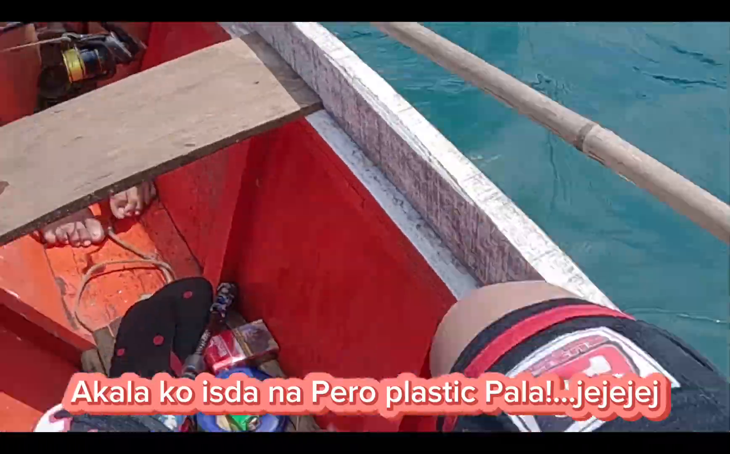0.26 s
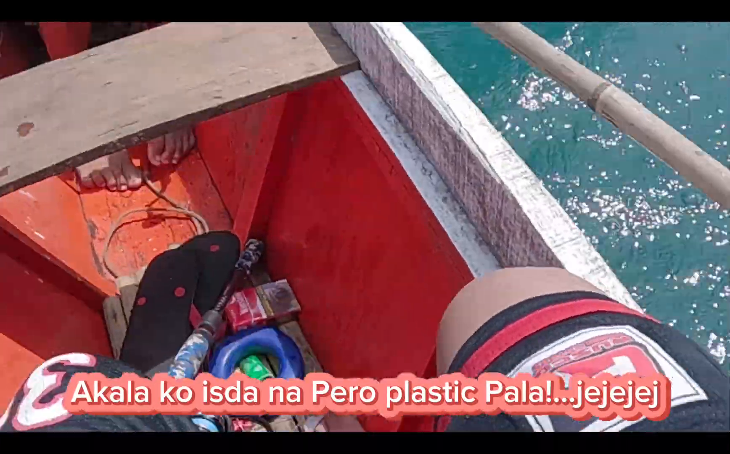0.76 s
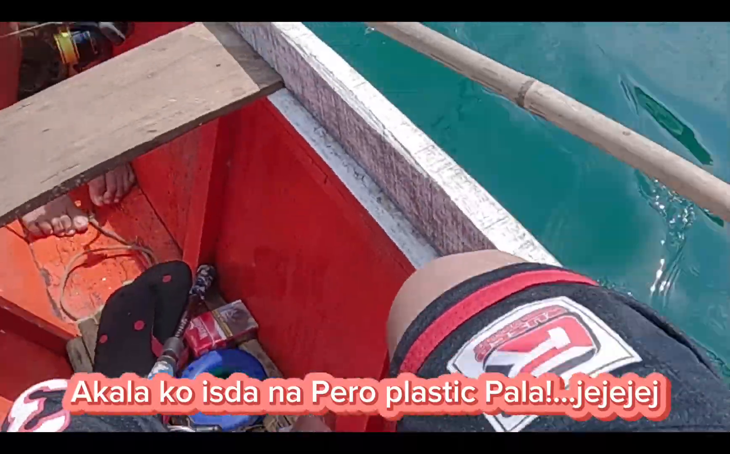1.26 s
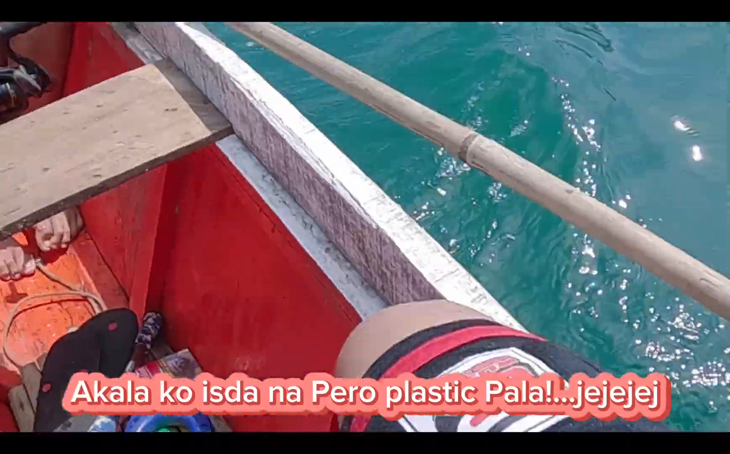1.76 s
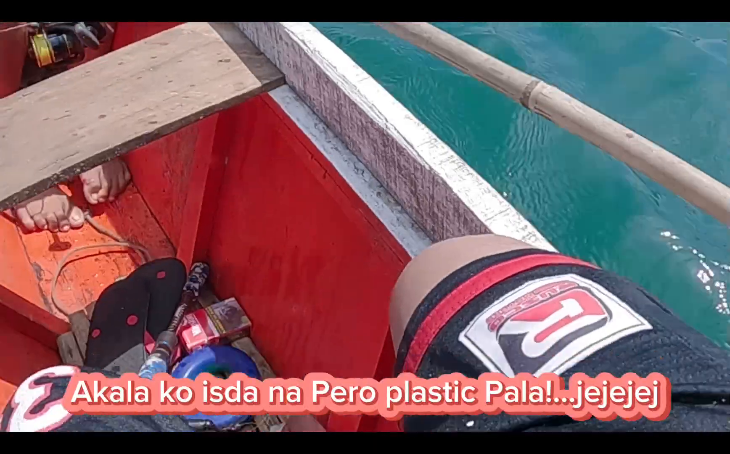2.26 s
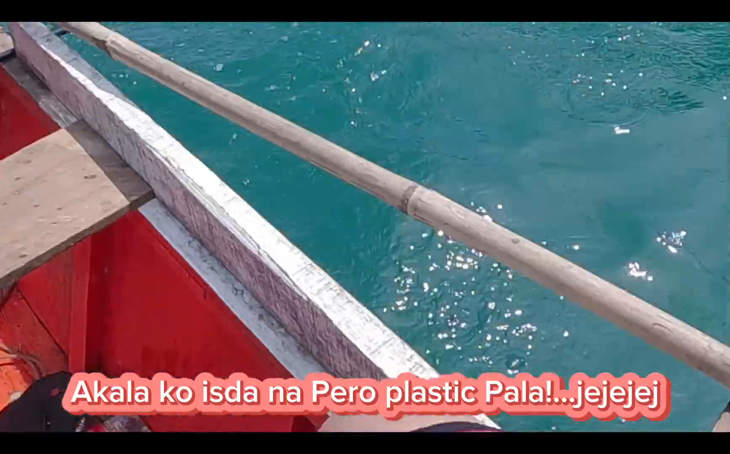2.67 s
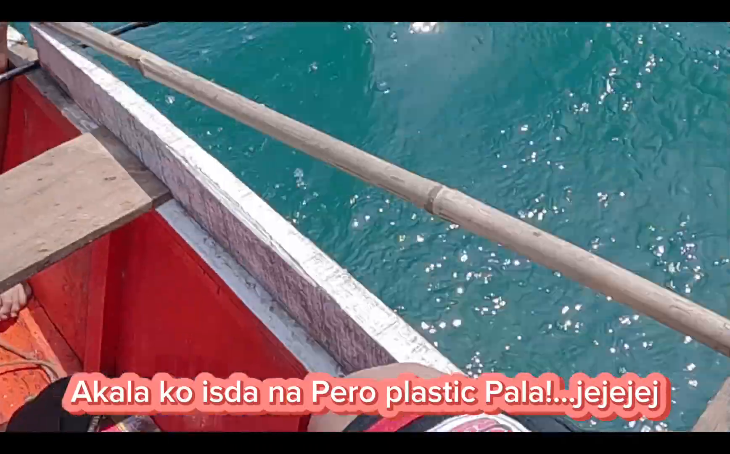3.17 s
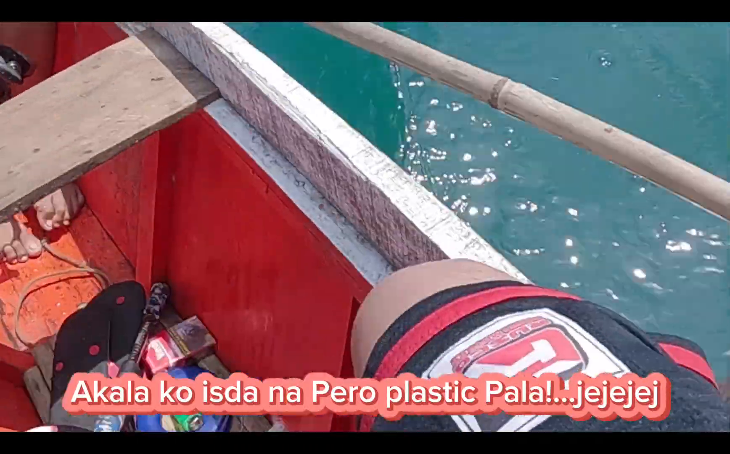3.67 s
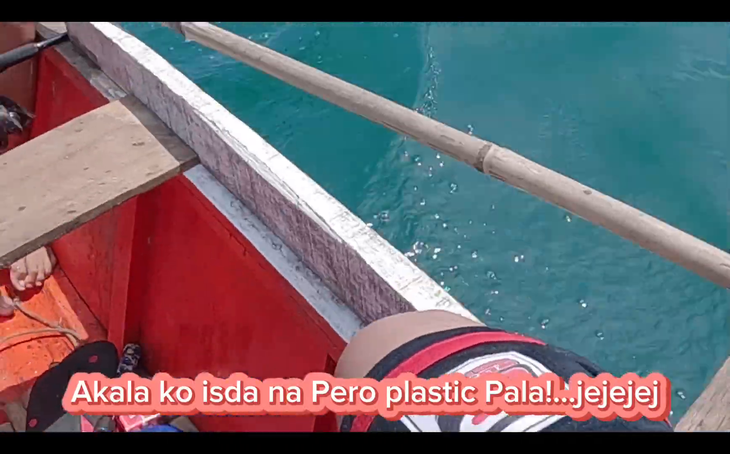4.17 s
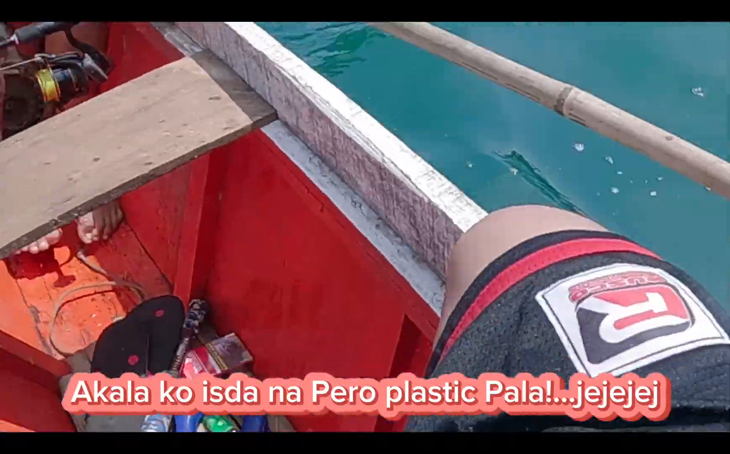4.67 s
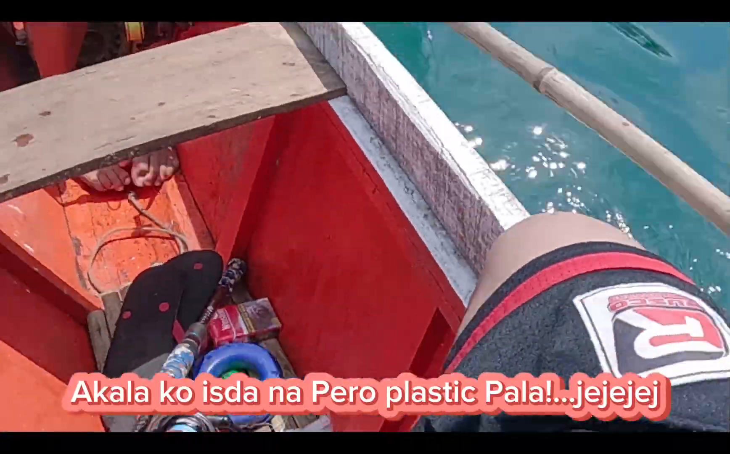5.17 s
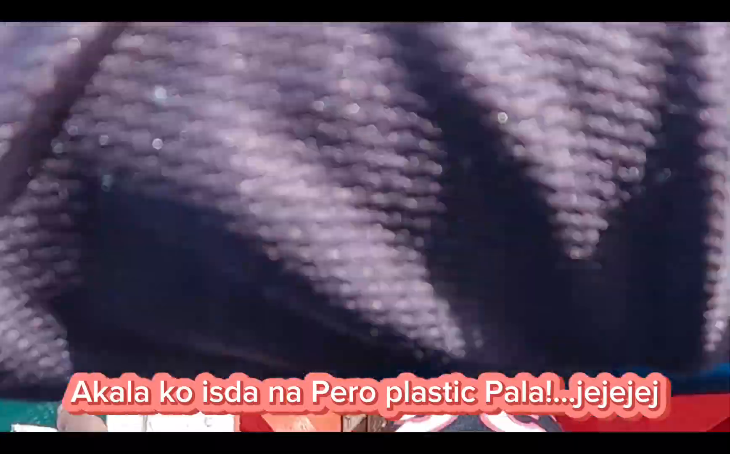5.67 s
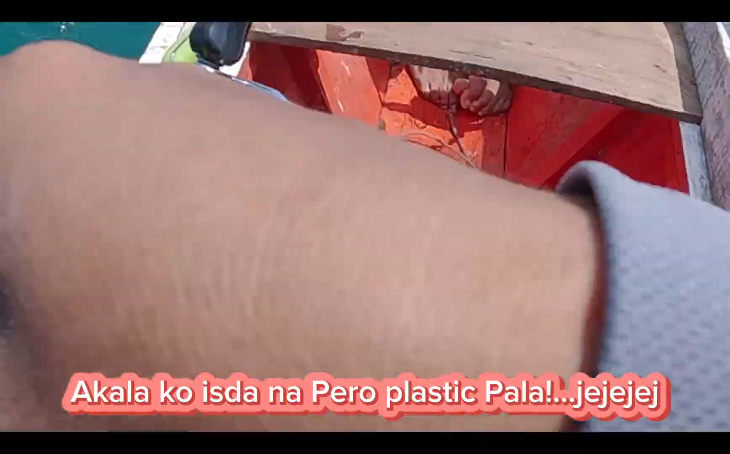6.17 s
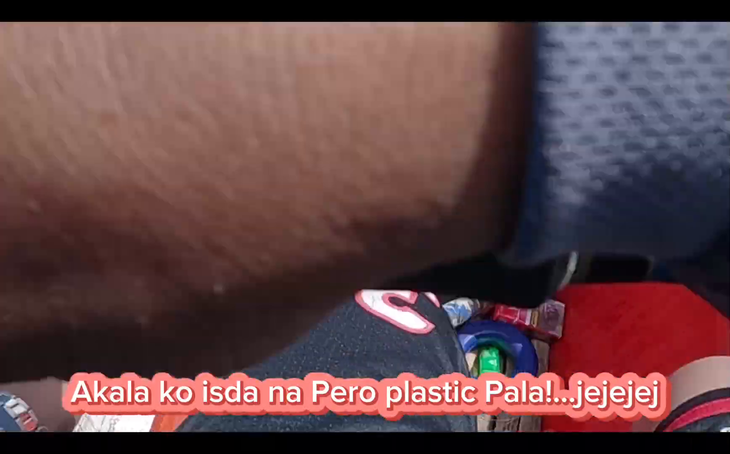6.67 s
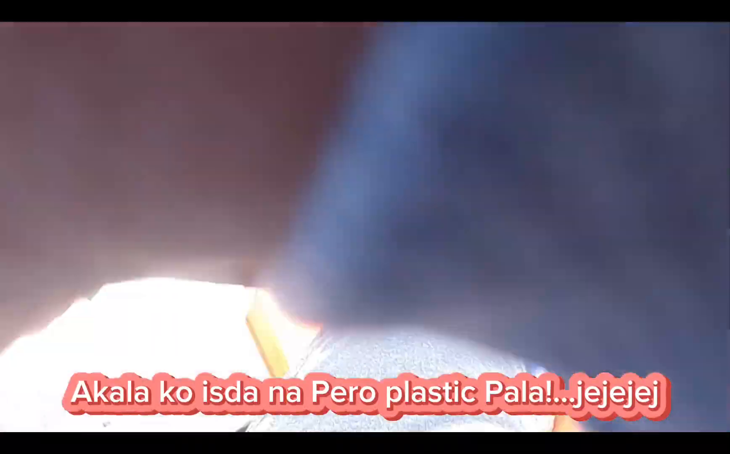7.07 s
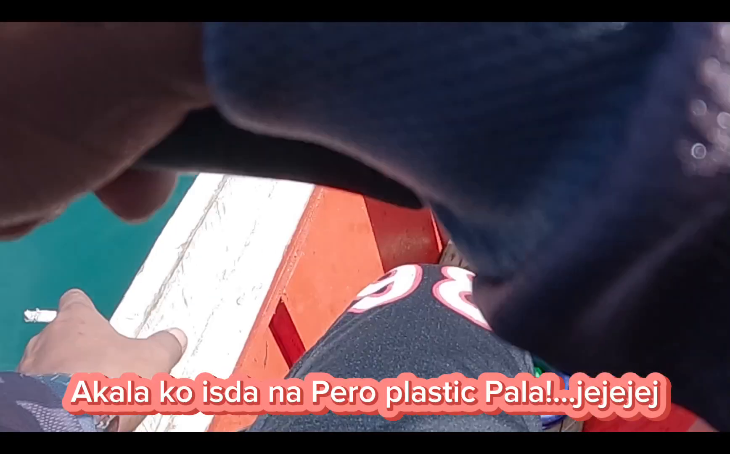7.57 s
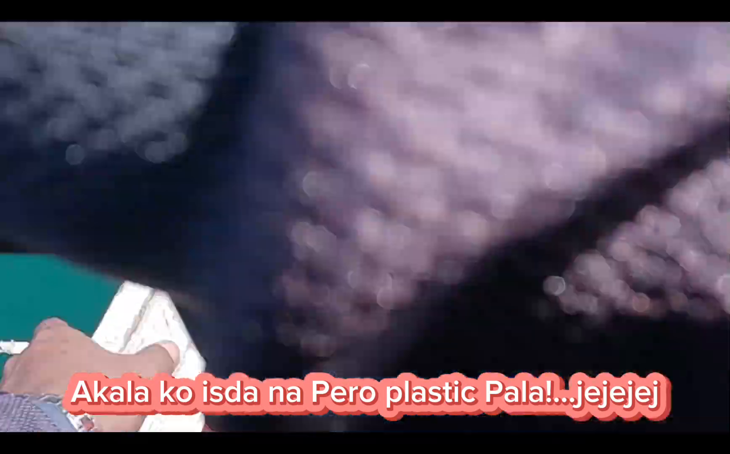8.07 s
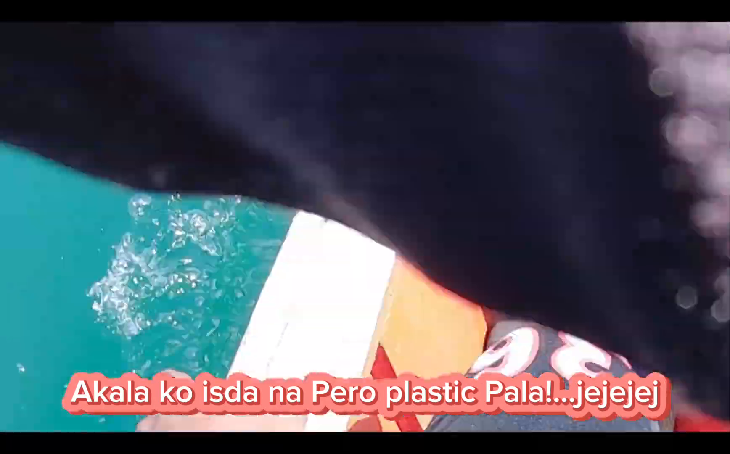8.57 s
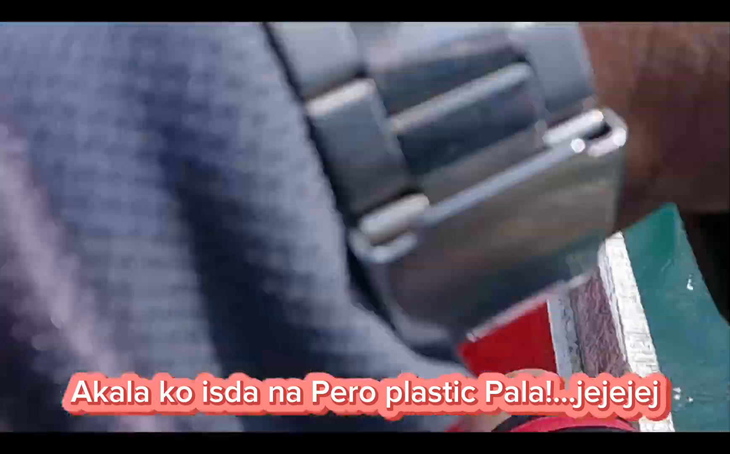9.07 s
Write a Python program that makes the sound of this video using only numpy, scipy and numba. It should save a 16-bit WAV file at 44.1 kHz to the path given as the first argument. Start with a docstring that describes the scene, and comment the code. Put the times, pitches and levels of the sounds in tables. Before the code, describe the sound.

A close, loud outboard-style buzz dominates, its rapid firings ringing in the exhaust pipe. Underneath are soft hull wash, fizzing spray, low gulps and short squeaky chirps. Past the middle the motor sags slightly and grows raspy and uneven, with dull wave knocks and faint sleeve rumble at the microphone. Near the end the throttle opens: higher, brighter, even drone. Open air, no echo.

```python
"""A small outrigger boat motors over calm open water, heard from a seat in the hull.
For 5 s the engine cruises with odd stumbles, its firings ringing the exhaust pipe; water washes and gulps
along the hull, and a rubbing part squeaks early on and near 4.8 s. Then the engine labours: the wash swells,
waves knock on the planks and a sleeve rumbles close by. Firing grows rough and stumbles; one more squeak.
At 8.4 s the engine is opened up: pitch jumps, firing evens out, wash falls and spray rises."""
import sys
import numpy as np
from scipy import signal
from scipy.fft import rfft, irfft, next_fast_len
from scipy.io import wavfile
from scipy.ndimage import uniform_filter1d, map_coordinates
from numba import njit

SR = 44100
rng = np.random.default_rng(int(sys.argv[2]) if len(sys.argv) > 2 else 0)


def dump(signal):
    """Clip the signal to [-1, 1] and save it as 16-bit WAV at the path in sys.argv[1]."""
    limited = np.clip(np.atleast_2d(signal).T, -1, 1)
    pcm = np.round(limited * 32767).astype(np.int16)
    wavfile.write(sys.argv[1], SR, pcm)


N = 410571
TIME_S = np.arange(N) / SR

# Water along the hull: time_s, level_db
WASH_LEVEL = [(0, -33.5), (5.4, -34.5), (5.75, -29.5), (8.3, -29.5), (8.6, -34), (9.3, -37.5)]
# Wash spectrum: freq_hz, gain_db
WASH_SPECTRUM = [(20, -44), (60, -31), (110, -26), (200, -12), (300, -6.5), (450, -0.5), (800, 0),
                 (1500, 1.5), (4000, -33.5)]
# Bow spray: time_s, level_db
SPRAY_LEVEL = [(0, -34), (4.5, -36.5), (4.74, -33), (7.8, -35), (8.6, -31.5), (9.3, -35)]
# Spray spectrum: freq_hz, gain_db
SPRAY_SPECTRUM = [(1500, 1.5), (4000, 14), (7000, 5), (8100, 0), (9000, 6), (10400, 0.5), (11600, -12),
                  (12600, -8), (14000, -12), (15600, -1.5)]
# Air pockets gulping under the bow: start_s, start_hz, level_db
GULPS = [(0.335, 500, -26), (0.41, 444, -23.5), (0.931, 474, -23), (1.006, 265, -32), (1.315, 302, -28),
         (1.451, 310, -30), (2.654, 260, -32), (3.042, 295, -30), (3.174, 410, -39), (3.993, 296, -31),
         (4.088, 300, -30), (4.546, 273, -31), (4.873, 290, -28)]
# Waves knocking on the planks: start_s, level_db, pitch_hz
WAVES = [(2.156, -30, 330), (2.217, -31, 210), (3.173, -29, 400), (5.048, -29, 400), (5.731, -28, 400),
         (5.823, -22, 360), (6.224, -26, 280), (6.641, -30, 297.7), (6.867, -28, 191), (7.518, -29, 260),
         (7.618, -28, 300), (7.803, -25, 280), (8.136, -24, 400), (8.912, -25, 423), (8.966, -25, 452)]
# Sleeve brushing close by: time_s, level_db
SLEEVE_LEVEL = [(5.4, -65), (5.7, -41.5), (7.8, -44), (8.4, -55)]
# Sleeve rumble spectrum: freq_hz, gain_db
SLEEVE_SPECTRUM = [(20, -20), (70, -10), (150, -2), (350, 5.5), (900, -19)]
# Slips of the rubbing part: start_s, length_s, start_hz, end_hz, level_db
SQUEAKS = [(0.644, 0.018, 1450, 1550, -21), (0.674, 0.009, 2200, 2330, -18), (0.694, .007, 2200, 2200, -18),
           (0.713, 0.01, 1910, 1880, -16.5), (0.73, 0.021, 1950, 1845, -17), (1.87, 0.026, 1370, 1410, -20),
           (1.889, 0.031, 1420, 1680, -16), (1.915, 0.037, 1670, 1650, -16.5),
           (1.956, 0.036, 1650, 1750, -22), (4.683, 0.013, 1880, 1750, -20), (4.702, .008, 1680, 1610, -17),
           (4.713, 0.013, 2050, 2230, -17), (4.724, 0.027, 2100, 1910, -16.5),
           (4.759, 0.01, 2130, 2020, -19), (4.776, 0.0088, 1950, 2150, -17),
           (4.785, 0.021, 2040, 1850, -21), (4.836, .016, 2450, 2270, -18.5),
           (4.896, 0.014, 1970, 2240, -17), (4.909, 0.049, 2000, 1990, -18.5),
           (4.957, 0.021, 2100, 1920, -19), (7.776, .024, 3540, 3233, -15)]
# Squeak body, read at each harmonic: freq_hz, gain_db
SQUEAK_BODY = [(2000, -44), (2700, -9), (3300, -6), (4200, -3.5), (5000, -10.5), (7000, -19.5),
               (8000, -23.5), (12000, -28)]
# Engine speed: time_s, firings_per_s
SPEED = [(0.0, 131.8), (0.72, 126.8), (0.93, 134.5), (1.06, 127.0), (1.61, 137.3), (1.79, 122.1),
         (2.25, 129.3), (2.31, 122.2), (2.49, 130.0), (2.87, 126.7), (3.19, 136.6), (3.37, 129.5),
         (3.53, 135.9), (3.71, 125.3), (4.98, 124.6), (5.47, 135.6), (5.56, 122.8), (5.65, 132.5),
         (5.69, 126), (5.74, 132), (5.78, 123), (5.9, 126.3), (6.04, 124), (6.1, 119.5), (6.17, 123.8),
         (6.28, 115), (6.32, 122.5), (6.55, 118.6), (6.71, 122.4), (6.75, 115.5), (6.81, 121.1),
         (6.93, 115.6), (6.99, 124.5), (7.04, 119.5), (7.45, 123.5), (7.5, 119), (8.35, 117), (8.43, 149.4),
         (8.51, 163.7), (8.82, 171.0), (8.96, 166), (9.06, 171.5), (9.14, 166.5), (9.31, 167.0)]
# Unevenness of the firings: time_s, roughness_0_to_1
ROUGHNESS = [(0, 0.36), (5.4, 0.3), (6.2, .45), (7.3, 0.55), (7.6, .9), (8.35, 1), (8.5, 0.2)]
# Weak firings: time_s, depth_db
STUMBLES = [(1.036, 4.5), (2.052, 3.5), (2.903, 5.5), (6.096, 4), (6.868, 4.5), (7.041, 4), (7.29, 3),
            (7.49, 3.5), (7.603, 8), (7.99, 3.5), (8.14, 3), (8.168, 4.5), (8.255, 3), (8.324, 3.5),
            (8.385, 3.5), (8.962, 3)]
# Engine tone by speed: firings_per_s, bark_db, ring_db, ring_hz, ring_width_hz, bite_db,
# heat_factor (by which hotter gas raises the silencer's resonances)
LOAD = [(122, -21, -18.5, 1795, 68, -34.5, 0.97), (126.5, -19.5, -20, 1833, 78, -34.5, 0.987),
        (131.3, -19.5, -21, 1802, 101, -34.5, 1.012), (174, -16.5, -17.5, 1892, 69, -28.5, 1.057)]
# Hull vibration: multiple_of_firing_rate, level_db
HULL_ORDERS = [(2, -45.5), (4, -38), (5, -46)]
# Gas rasp spectrum: freq_hz, gain_db
RASP_SPECTRUM = [(1500, -18), (2400, 9), (3000, 11.5), (4000, -15), (4700, -47), (5700, -5), (6400, -24),
                 (8000, -20.5), (11000, -3.5), (16000, -29)]
# Ringing engine metal: freq_hz, width_hz, relative_db
CASING_MODES = [(3550, 69, 9), (4140, 340, 0.5), (5200, 580, 1.5), (7220, 360, -1), (9260, 670, -5)]
# Upper pipe resonances: cruise_hz, cruise_width_hz, relative_db cruising, relative_db opened up
BITE_MODES = [(2515, 34, 9, -21), (2840, 270, -4, 5), (3230, 115, -5, 9.5), (3599, 162, 11.5, 14.5),
              (3820, 200, -3, 4), (4300, 120, -6, -13), (5420, 470, -5.5, -12), (6320, 240, -11.5, -12),
              (7300, 190, -6.5, 1), (9180, 330, -7, -11), (10400, 400, -11, -8)]
# Silencer resonances: unheated_hz, width_hz, relative_db cruising, relative_db opened up
EXHAUST_MODES = [(663, 159, -0.5, 1), (1077, 603, 2, -0.5), (1380, 154, 10, 11), (1637, 120, -16, 5),
                 (2225, 210, -6.5, -38)]

# Small air pockets: levels relative to the wash
POCKETS_PER_S, POCKET_HZ, POCKET_SPREAD_OCTAVES = 5.4, 255.4, .12
POCKET_REL_DB, POCKET_SPREAD_DB = -3.5, -6
# Speed hunting: share of the speed for each swing, turns per s of the slow and the quick one
HUNT_SHARE, HUNT_PER_S, FLUTTER_PER_S = .0105, 9, 22
# Share of the speed lost per dB of a weak firing, and time constant of the recovery
SAG_SHARE_PER_DB, SAG_RECOVERY_S = .004, .025
# Gas rasp in even running, and its rise at roughness 1
RASP_DB, RASP_ROUGH_DB = -39.8, 4
# Rise and broadening of the upper pipe resonances when opened up, as shares
BITE_RISE_SHARE, BITE_BROADENING_SHARE = 0.014, 0.76
CUTOFF_HZ = 15800


def from_db(db):
    """Amplitude factor of a level in dB."""
    return 10 ** (np.asarray(db) / 20)


def rms_one(x):
    """Scale to rms 1."""
    return x / np.sqrt(np.mean(x ** 2) + 1e-20)


def in_time(rows):
    """Each column of a time table at every sample."""
    time_s, *columns = np.transpose(rows)
    return [np.interp(TIME_S, time_s, column) for column in columns]


def at_speed(firings_per_s):
    """Each column of the load table at the momentary engine speed."""
    speeds, *columns = np.transpose(LOAD)
    return [np.interp(firings_per_s, speeds, column) for column in columns]


def gain_at(spectrum, hz):
    """Gain of a spectrum, read on a log-frequency axis."""
    points_hz, gain_db = np.transpose(spectrum)
    return from_db(np.interp(np.log(hz + 1e-3), np.log(points_hz), gain_db))


def coloured(spectrum):
    """Noise with the given spectrum, rms 1."""
    size = next_fast_len(N)
    bins = rfft(rng.standard_normal(size))
    gain = gain_at(spectrum, np.fft.rfftfreq(size, 1 / SR))
    return rms_one(irfft(bins * gain, size)[:N])


def drift(turns_per_s):
    """Smooth chance with about the given turns a second, spread 1."""
    coarse_s = TIME_S[::32]
    points = rng.standard_normal(size=4096)
    slow = map_coordinates(points, [coarse_s * turns_per_s * 2], order=3, mode="wrap")
    return np.interp(TIME_S, coarse_s, rms_one(slow))


def cut(x, hz, kind, order=2):
    """Butterworth filter."""
    return signal.sosfilt(signal.butter(order, hz, kind, fs=SR, output="sos"), x + 1e-18)


@njit
def swing(x, step, damping):
    """A damped oscillator whose tuning and loss may change at every sample."""
    out, speed, place = np.zeros(len(x)), 0.0, 0.0
    for i in range(len(x)):
        v = (speed + step[i] * (x[i] - place)) / (1 + step[i] * (step[i] + damping[i]))
        speed, place = 2 * v - speed, place + 2 * step[i] * v
        out[i] = damping[i] * v
    return out


def resonate(x, hz, width_hz):
    """A resonance of gain 1 whose centre and width may move."""
    step = np.tan(np.pi * hz / SR) * np.ones(N)
    damping = width_hz / hz * np.ones(N)
    return swing(x + 1e-18, step, damping)


def evened(x):
    """Hold the running rms at 1."""
    power = uniform_filter1d(uniform_filter1d(x ** 2, size=2200), size=2200)
    return x / np.sqrt(power + 1e-12)


def decaying(x, decay_s):
    """Each impulse starts an exponential decay."""
    return signal.lfilter([1], [1, -np.exp(-1 / (decay_s * SR))], x)


def swell(age_s, peak_s):
    """An envelope that rises to 1 and dies away."""
    return age_s / peak_s * np.exp(1 - age_s / peak_s)


def impulses(times_s, sizes):
    """A click of the given size at each time."""
    out = np.zeros(N)
    out[(times_s * SR).astype(int)] = sizes
    return out


def by_chance(per_s):
    """Sample positions of events that come at random at the given rate."""
    return np.flatnonzero(rng.random(N) < per_s / SR)


def add(out, start, sound):
    """Mix a sound in at a sample position, cut at the end."""
    out[start:start + len(sound)] += sound[:N - start]


def water(wash_db, lumpy_db, fizz_db):
    """Lumpy wash under the hull and fine fizzing spray from the bow: two noises of wavering level."""
    spray_db, = in_time(SPRAY_LEVEL)
    wash = from_db(wash_db + lumpy_db * np.tanh(drift(16))) * coloured(WASH_SPECTRUM)
    spray = from_db(spray_db + fizz_db * drift(150)) * coloured(SPRAY_SPECTRUM)
    return wash + spray


def gurgles(wash_db, swell_s, rise_per_s):
    """Air pockets trapped under the bow ring briefly, rising in pitch; small ones follow the wash level."""
    out, age_s = np.zeros(N), np.arange(SR // 10) / SR
    chance = rng.standard_normal(size=(400, 2))
    small = []
    for at, (pitch, size) in zip(by_chance(POCKETS_PER_S), chance):
        start_hz = POCKET_HZ * 2 ** (POCKET_SPREAD_OCTAVES * pitch)
        level_db = wash_db[at] + POCKET_REL_DB + POCKET_SPREAD_DB * np.tanh(size)
        small.append((at / SR, start_hz, level_db))
    for start_s, start_hz, level_db in GULPS + small:
        cycles = start_hz * age_s * (1 + rise_per_s / 2 * age_s)   # integral of the linear pitch rise
        ring = swell(age_s, swell_s) * np.sin(2 * np.pi * cycles)
        add(out, int(start_s * SR), from_db(level_db) * ring)
    return out


def slaps(swell_s, band_factor):
    """Each wave gives the planks a short dull knock: a noise burst banded around its own pitch."""
    out, age_s = np.zeros(N), np.arange(SR // 6) / SR
    for start_s, level_db, pitch_hz in WAVES:
        band_hz = [pitch_hz / band_factor, pitch_hz * band_factor]
        knock = rms_one(cut(rng.standard_normal(len(age_s)), band_hz, "band"))
        add(out, int(start_s * SR), from_db(level_db) * swell(age_s, swell_s) * knock)
    return out


def sleeve(lumpy_db):
    """Cloth brushing close by gives an uneven low rumble."""
    level_db, = in_time(SLEEVE_LEVEL)
    return from_db(level_db + lumpy_db * np.tanh(drift(9))) * coloured(SLEEVE_SPECTRUM)


def squeaks(wobble_share, flicker_db):
    """Stick-slip chirps: at each slip a raspy tone of harmonics 2 to 6 glides in pitch."""
    out, wobble = np.zeros(N), 1 + wobble_share * drift(200)
    flicker = {k: from_db(flicker_db * np.tanh(drift(70))) for k in range(2, 7)}
    for start_s, length_s, start_hz, end_hz, level_db in SQUEAKS:
        span = slice(int(start_s * SR), int((start_s + length_s) * SR))
        along = np.linspace(0, 1, len(out[span]))
        hz = (end_hz + (start_hz - end_hz) * (1 - along) ** 0.91) * wobble[span]
        phase = 2 * np.pi * np.cumsum(hz) / SR
        tone = sum(flicker[k][span] * gain_at(SQUEAK_BODY, k * hz) * np.sin(k * phase) for k in flicker)
        envelope = np.sqrt(np.abs(np.sin(np.pi * along)))
        out[span] += from_db(level_db) * envelope * tone
    return out


def crank(firings_per_s, weak):
    """Firing cycles counted so far: the speed hunts, and sags after each weak firing."""
    sag = SAG_SHARE_PER_DB * decaying(weak + 1e-18, SAG_RECOVERY_S)
    hunting = HUNT_SHARE * (drift(HUNT_PER_S) + drift(FLUTTER_PER_S))
    return np.cumsum(firings_per_s * (1 + hunting - sag + sag.mean())) / SR   # mean speed kept


def firings(cycles, rough, jitter_s, shimmer_db):
    """One click a cycle, less even in time and strength when the engine runs rough."""
    at = np.interp(np.arange(1, int(cycles[-1])), cycles, np.arange(N))
    chance = rng.standard_normal((len(at), 2)) * rough[at.astype(int), None]
    at = np.clip(at + chance[:, 0] * jitter_s * SR, 0, N - 2)
    strength = from_db(shimmer_db * chance[:, 1])
    whole = at.astype(int)
    clicks = np.zeros(N)
    clicks[whole] += strength * (1 - at + whole)   # shared between two samples
    clicks[whole + 1] += strength * (at - whole)
    return clicks


def puffs(clicks, decay_s):
    """The gas flow that dies away after each firing, rms 1."""
    return rms_one(decaying(clicks, decay_s))


def hull_hum(cycles, waver_db):
    """The hull hums at low multiples of the firing rate, each wavering in level."""
    return sum(from_db(level_db + waver_db * drift(13)) * np.sin(2 * np.pi * multiple * cycles)
               for multiple, level_db in HULL_ORDERS)


def clatter(clicks, rasp_db):
    """Gas rasp and ringing metal: noise throbbing with the firings, the metal's share through resonances."""
    throb = rms_one(1 + .6 * puffs(clicks, decay_s=.0025))
    shake = throb * rng.standard_normal(N)
    metal = rms_one(sum(from_db(db) * resonate(shake, hz, width_hz) for hz, width_hz, db in CASING_MODES))
    level = from_db(rasp_db + 2.4 * drift(12))
    rasp = throb * coloured(RASP_SPECTRUM)
    return level * (rasp + from_db(-2.5) * cut(metal, 3100, "high"))


def bite(clicks, level_db, opened):
    """Firing pulses ring the upper pipe resonances, which hot, fast gas raises and broadens."""
    rise = 1 + BITE_RISE_SHARE * opened
    broadening = 1 + BITE_BROADENING_SHARE * opened
    rings = np.zeros(N)
    for k, (hz, width_hz, cruise_db, open_db) in enumerate(BITE_MODES):
        gain = (-1) ** k * from_db(cruise_db + opened * (open_db - cruise_db))   # alternate polarity
        rings += gain * resonate(clicks, hz * rise, width_hz * broadening)
    return from_db(level_db) * evened(cut(rings, 1370, "high"))


def exhaust(clicks, rough, opened, bark_db, ring_db, ring_hz, ring_width_hz, heat, smooth_db, rough_db):
    """Pressure pulses and their turbulence pass the silencer's resonances and ring the pipe."""
    turbulence = puffs(clicks, decay_s=.004) * rng.standard_normal(N)
    gas = rms_one(clicks) + from_db(smooth_db + rough_db * rough) * turbulence
    gas = cut(cut(gas, 800, "high"), 5500, "low")
    modes = [from_db(cruise_db + opened * (open_db - cruise_db)) * resonate(gas, hz * heat, width_hz)
             for hz, width_hz, cruise_db, open_db in EXHAUST_MODES]
    bark = sum(modes[:2]) - sum(modes[2:])   # the lower two swing against the upper ones
    ring = resonate(gas, ring_hz, ring_width_hz)
    return from_db(bark_db) * evened(bark) - from_db(ring_db) * evened(ring)


def dispersed(x, hz, width_hz):
    """The pipe delays the band around its centre most: an all-pass."""
    return x - 2 * resonate(x, hz, width_hz)


def stumbling(weak, width_s):
    """Gain of the drone, which dips for a few cycles around each weak firing."""
    dip = np.exp(-(np.arange(-SR // 20, SR // 20) / SR / width_s) ** 2)
    return from_db(-signal.oaconvolve(weak, dip, "same"))


def scene():
    """The engine's speed sets its tone; water, a sleeve and a rubbing part sound around it."""
    (firings_per_s,), (rough,), (wash_db,) = in_time(SPEED), in_time(ROUGHNESS), in_time(WASH_LEVEL)
    gulping = gurgles(wash_db, swell_s=.007, rise_per_s=16)
    sea = water(wash_db, lumpy_db=5.5, fizz_db=1.5) + gulping + slaps(swell_s=0.0062, band_factor=1.9)
    rubbing = squeaks(wobble_share=.016, flicker_db=3)

    bark_db, ring_db, ring_hz, ring_width_hz, bite_db, heat = at_speed(firings_per_s)
    cruise_per_s, open_per_s = LOAD[-2][0], LOAD[-1][0]
    opened = np.clip((firings_per_s - cruise_per_s) / (open_per_s - cruise_per_s), 0, 1)
    weak = impulses(*np.transpose(STUMBLES))
    cycles = crank(firings_per_s, weak)
    clicks = firings(cycles, rough, jitter_s=.00005, shimmer_db=1.4)   # spreads at roughness 1
    engine = exhaust(clicks, rough, opened, bark_db, ring_db, ring_hz, ring_width_hz, heat,
                     smooth_db=-22, rough_db=10)
    engine = engine + clatter(clicks, RASP_DB + RASP_ROUGH_DB * rough)
    engine = dispersed(engine + bite(clicks, bite_db, opened), hz=2087, width_hz=880)
    engine = engine * stumbling(weak, width_s=0.011) + hull_hum(cycles, waver_db=3.5)
    return (engine + sea + rubbing + sleeve(lumpy_db=5.5))[None]


def record(dry):
    """The tallest peaks are rounded and the top is cut steeply."""
    rounded = dry / np.sqrt(np.sqrt(1 + np.square(np.square(dry / .64))))   # never beyond .64
    low_pass = signal.ellip(12, .1, 90, CUTOFF_HZ, fs=SR, output="sos")
    return signal.sosfilt(low_pass, rounded)


dry = scene()
out = record(dry)
dump(out)
```